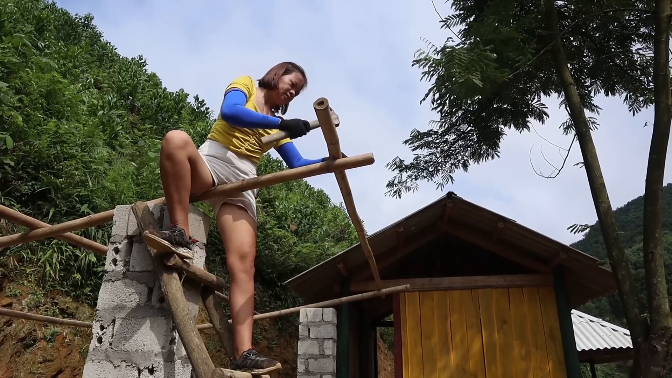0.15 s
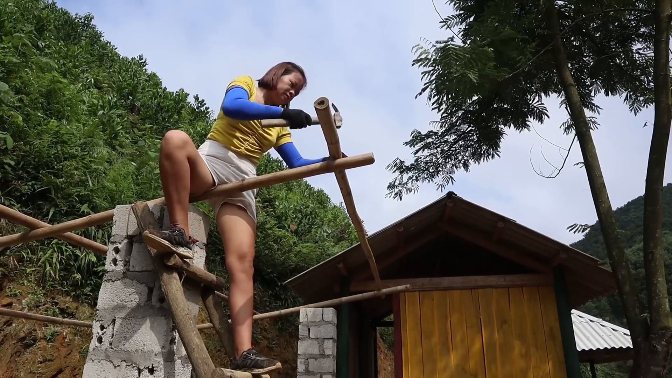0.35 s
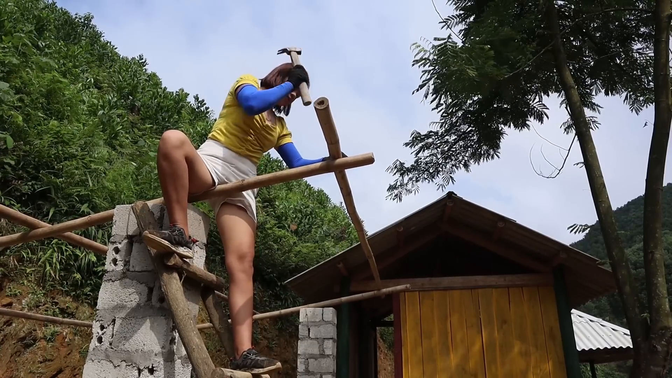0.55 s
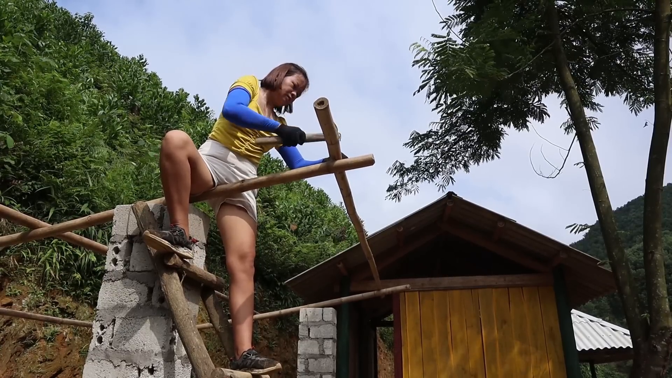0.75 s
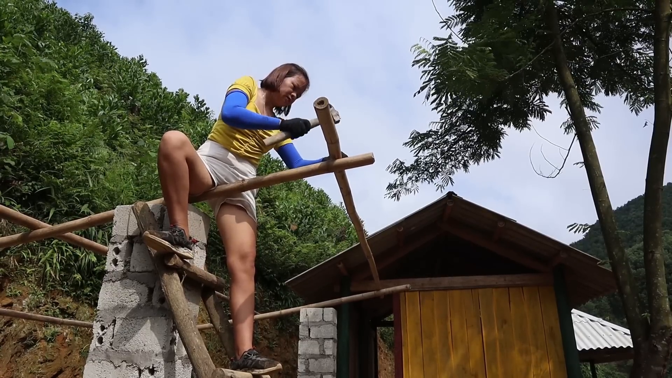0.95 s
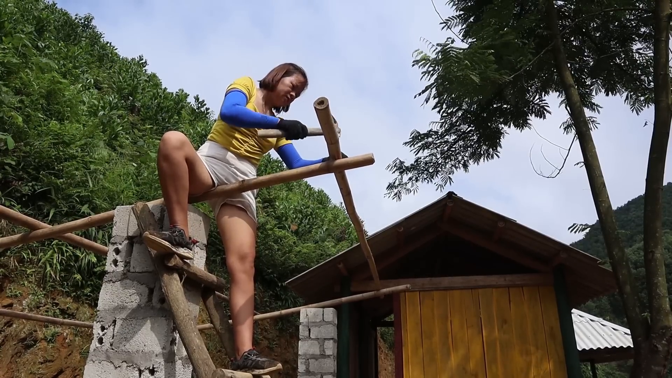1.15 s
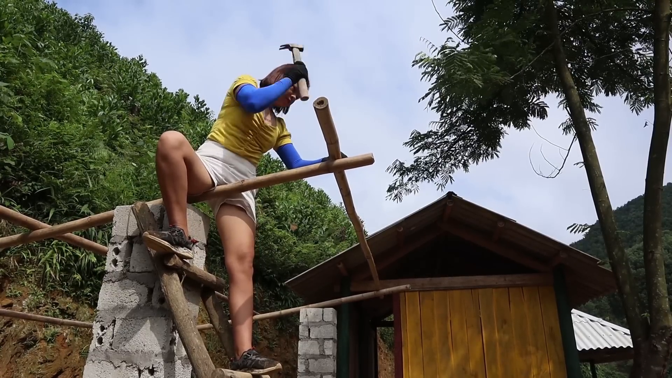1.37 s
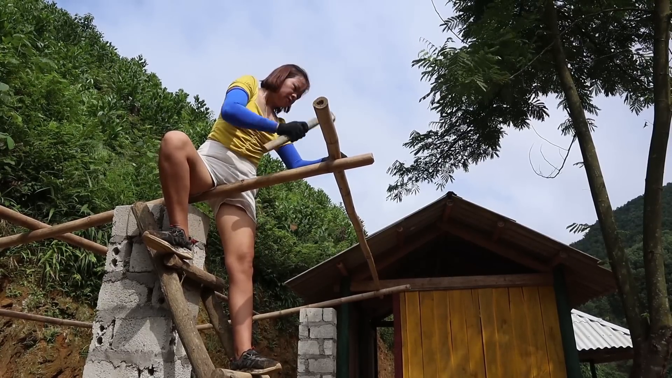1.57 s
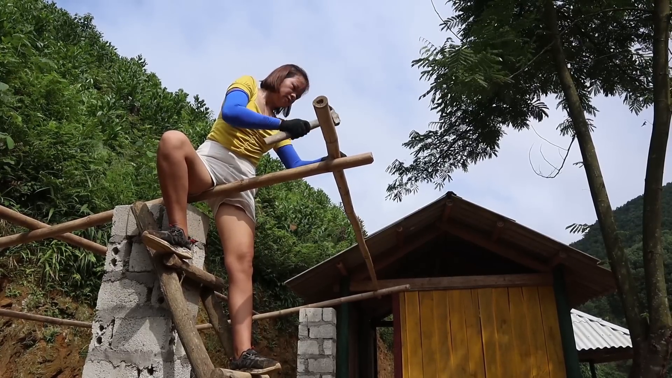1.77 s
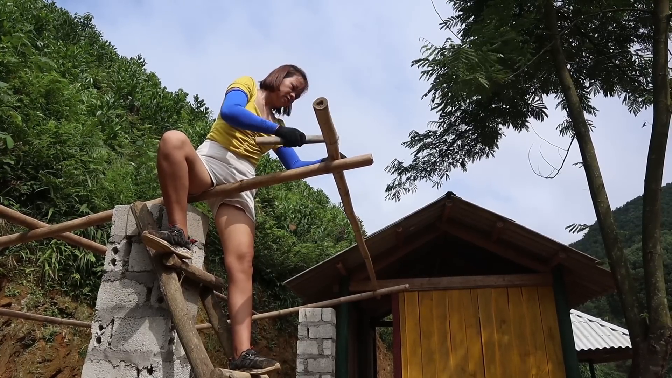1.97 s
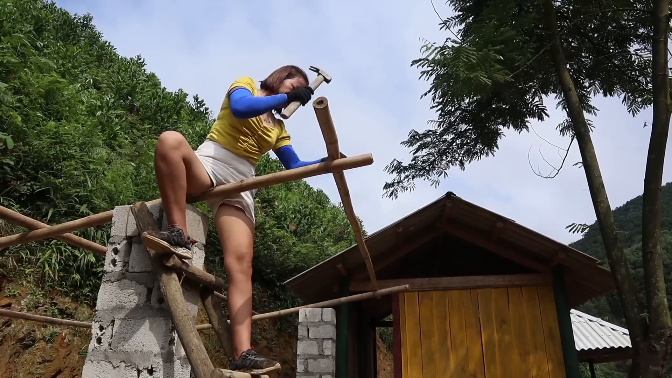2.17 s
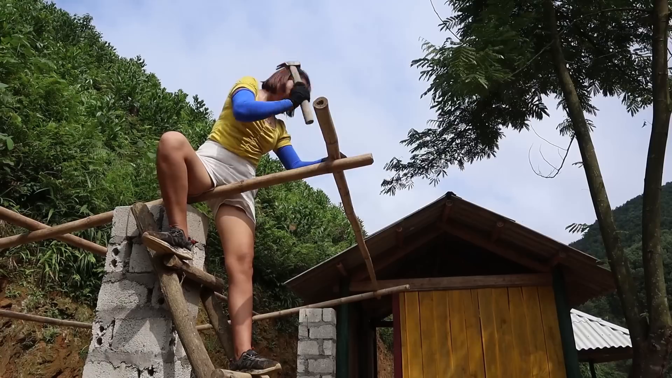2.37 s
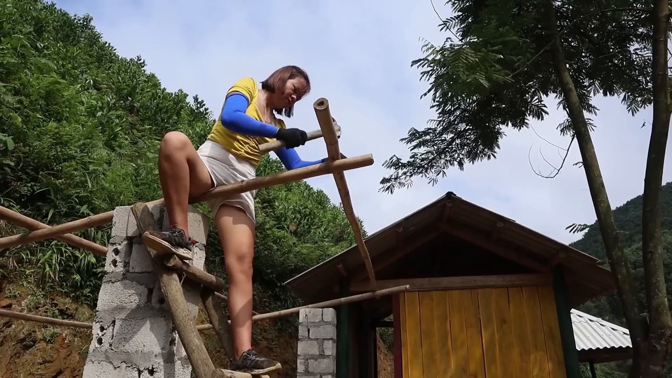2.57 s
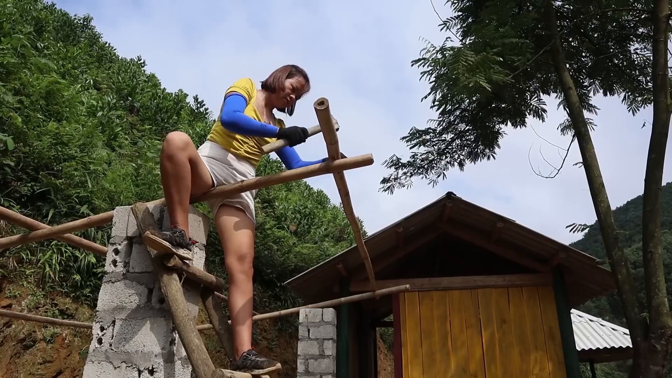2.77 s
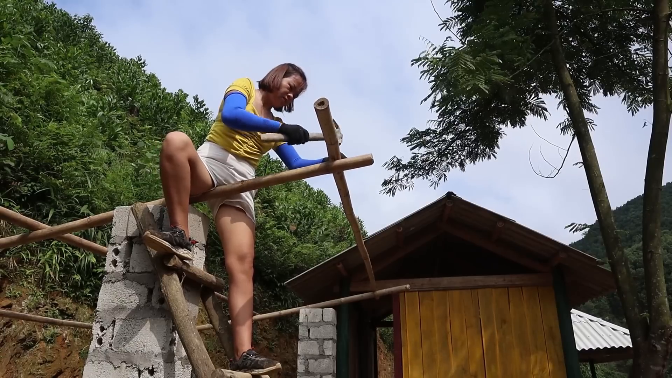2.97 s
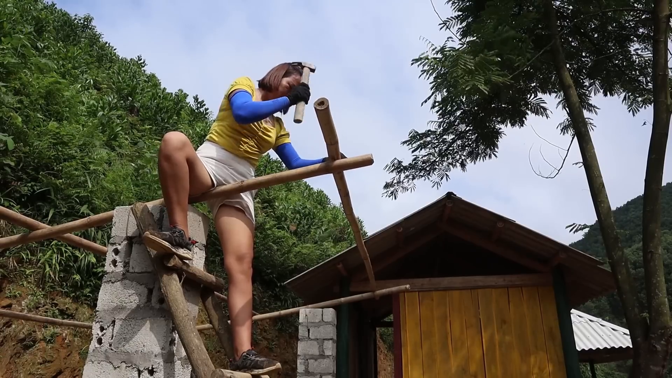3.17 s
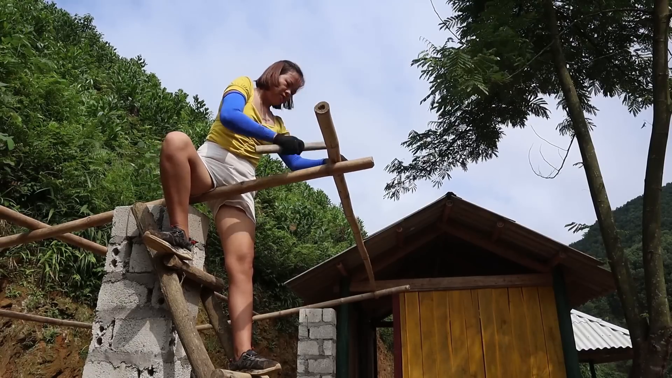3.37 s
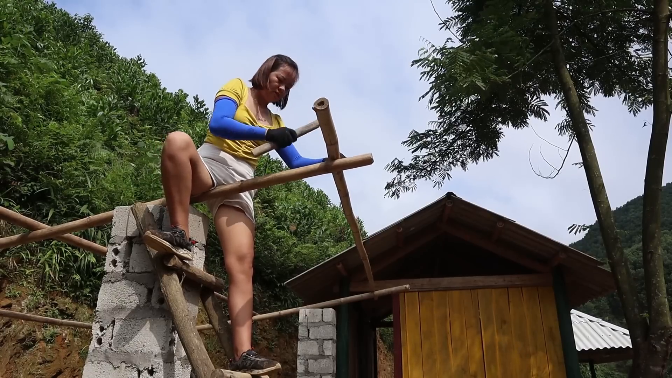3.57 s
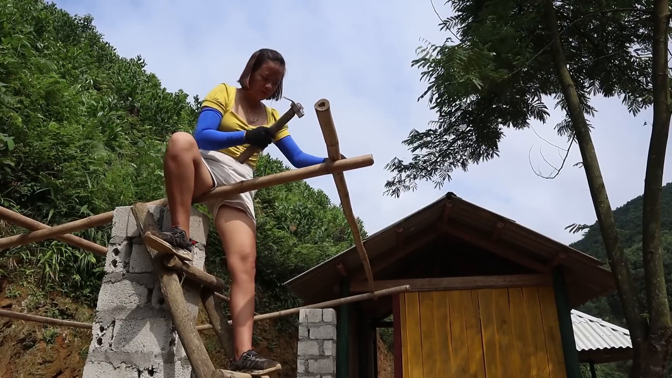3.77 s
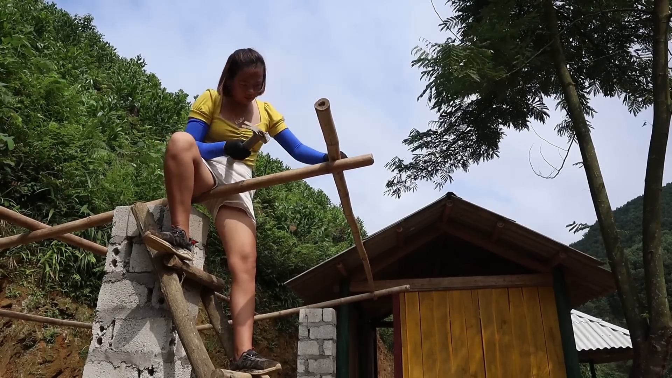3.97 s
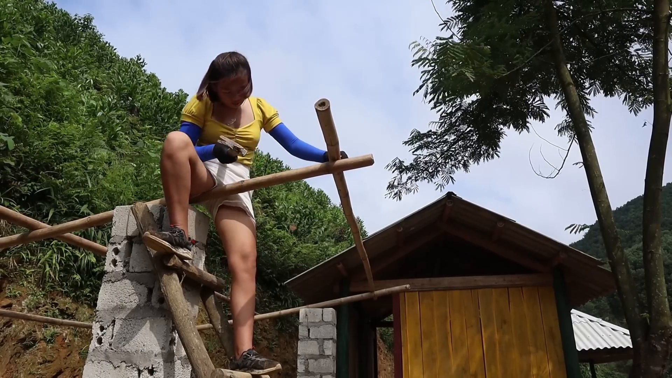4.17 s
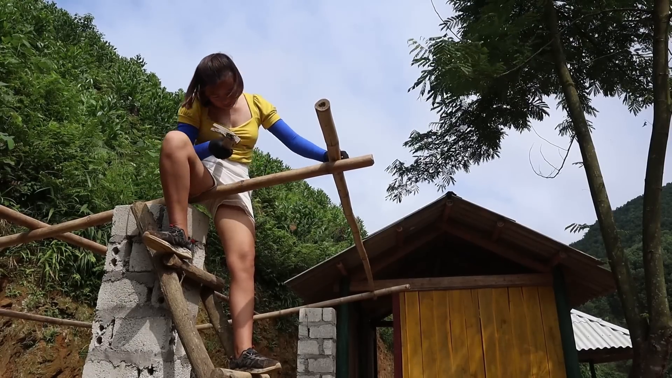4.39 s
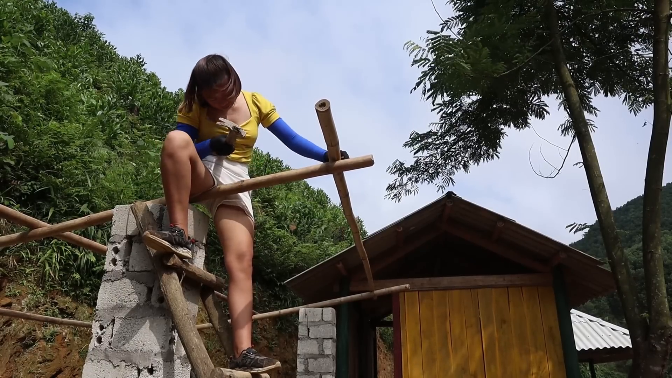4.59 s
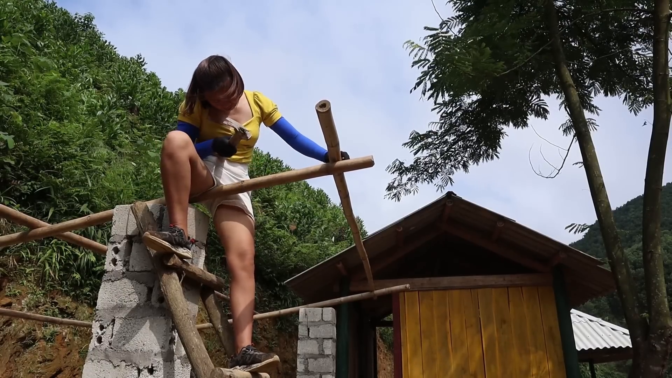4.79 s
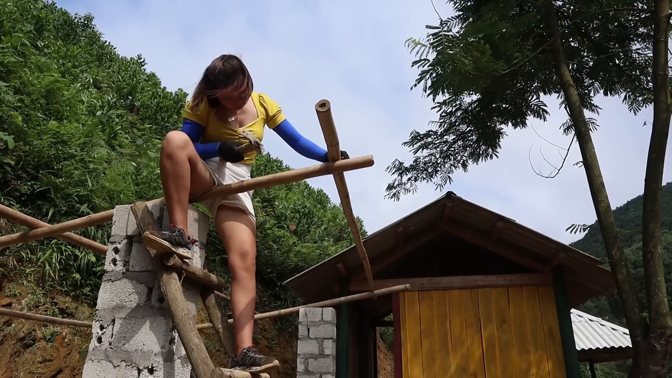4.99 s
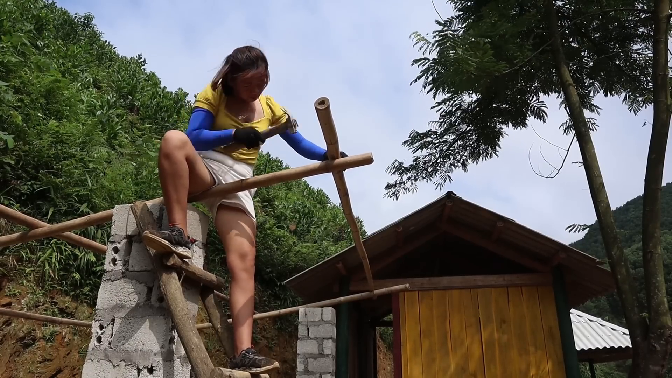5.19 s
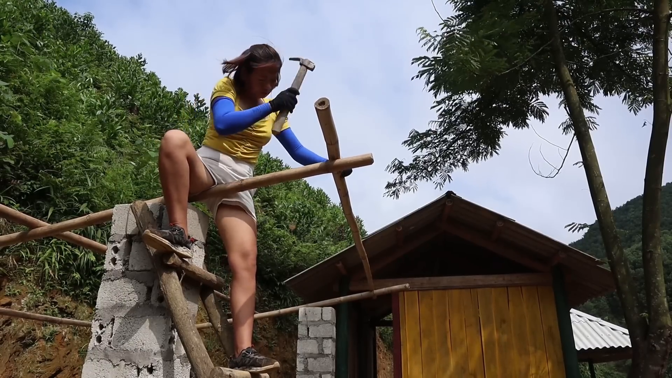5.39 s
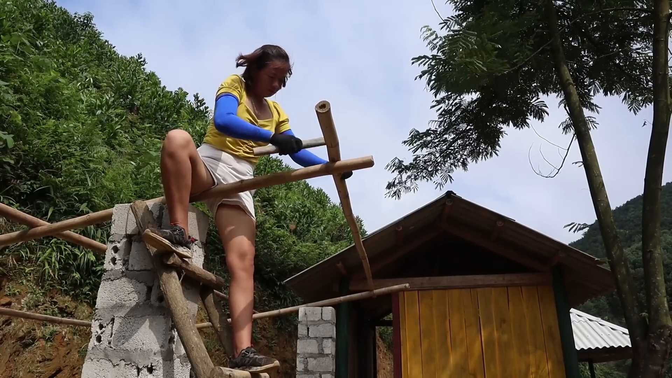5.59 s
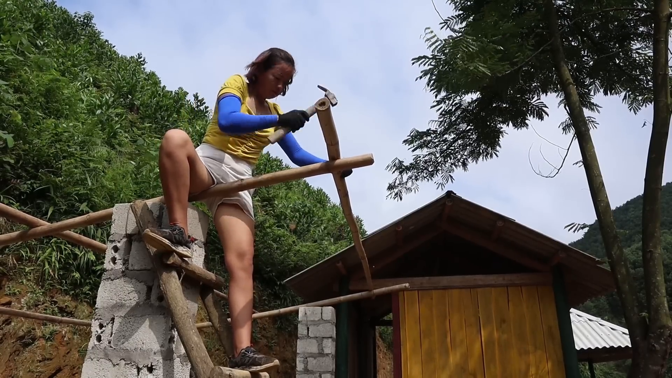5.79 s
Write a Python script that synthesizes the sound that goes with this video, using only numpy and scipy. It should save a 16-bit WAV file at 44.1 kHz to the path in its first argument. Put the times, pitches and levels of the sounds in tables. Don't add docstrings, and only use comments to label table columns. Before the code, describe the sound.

A close stereo outdoor scene of hammering on a round timber pole. The clip opens on the tail of a blow, with a loose wooden knock at 0.15 s. Blows land at about 0.34, 0.83, 1.18, 1.7, 2.07, 2.57, 3.0 and 3.47 s, alternating dull, hollow wood with brighter steel-on-nail cracks; the last of these is hardest, slightly clipped. Each rings briefly in pole and nail, slaps back from ground, block wall and hut, and leaves a faint wash from trees. Softer wood-on-wood rebounds fall between, near 1.0, 1.9 and 2.65 s. From 3.7 to 5.6 s hammering pauses: tiny claw and nail ticks, low wind puffs, strongest around 4.5 s with another near 5.15 s. Leaves hiss very faintly throughout; a low far bird note at 2.35 s and high falling calls at 4.2 and 4.55 s are barely audible. A final solid blow comes at 5.7 s, with a weak rebound.

```python
import sys
import numpy as np
from scipy import signal
from scipy.fft import rfft, irfft, next_fast_len
from scipy.io import wavfile
from scipy.ndimage import uniform_filter1d, map_coordinates

SR = 44100
rng = np.random.default_rng(int(sys.argv[2]) if len(sys.argv) > 2 else 0)


def master(y):
    cut = np.clip(np.atleast_2d(y).T, -1, 1)
    pcm = np.round(cut * 32767)
    wavfile.write(sys.argv[1], SR, pcm.astype(np.int16))


def magnitude_from_level(level_db):
    exponent = np.asarray(level_db, float) / 20
    return 10 ** exponent


N = 257544
LEAD = SR // 10


def unit(x):
    return x / np.sqrt(np.mean(x ** 2) + 1e-20)


def along(points, hz):
    point_hz, value = np.transpose(points)
    return np.interp(np.log(hz + 1), np.log(point_hz + 1), value)


def wobble(rate, size=N):
    knots = rng.standard_normal(int(size * rate / SR) + 4)
    return map_coordinates(knots, [np.arange(size) * rate / SR])


def filtered(x, response):
    size = next_fast_len(x.shape[-1] + 4096)
    spectrum = rfft(x, size) * response(np.fft.rfftfreq(size, 1 / SR))
    return irfft(spectrum, size)[..., :x.shape[-1]]


def body(x, modes):
    def resonances(f):
        total = 0
        for k, (hz, width, db) in enumerate(modes):
            total = total + (-1) ** k * magnitude_from_level(db) * 1j * f * width / (hz * hz - f * f + 1j * f * width)
        return total
    y = filtered(x, resonances)
    return y / np.abs(y).max()


def ringing(modes):
    t = np.arange(SR // 2) / SR
    chance_db = rng.normal(0, 2.5, len(modes))
    lines = 0
    for (hz, db, t60), chance in zip(modes, chance_db):
        rattle = 0.8 * min(1, hz / 700) * wobble(60, len(t))
        lines = lines + magnitude_from_level(db + chance - 60 * t / t60) * np.sin(2 * np.pi * hz * t + rattle)
    return lines[None] * (1 - np.exp(-t / 0.0024))


def push(t, contact):
    return t / contact * np.exp(-t / contact)


def add(track, s, sound):
    part = track[:, LEAD + round(s * SR):][:, :sound.shape[1]]
    part += sound[:, :part.shape[1]]


def pair(noise, alike):
    def mid_side(hz):
        turn = np.arccos(np.clip(along(alike, hz), -1, 1)) / 2
        return np.array([np.cos(turn), np.sin(turn)])
    mid, side = filtered(noise, mid_side)
    return np.array([mid + side, mid - side])


# start_s, strength_db, steel_crack_db, pole_bending_db
HAMMER_BLOWS = [(-0.028, 0, -13, -17.5),
                (0.3424, -2, -21.5, -19),
    (0.8273, 0.5, -12.5, -15),
    (1.181, -2, -22, -17.5),
    (1.7047, 1, -11, -19),
    (2.0672, -0.5, -19, -17),
    (2.571, -0.5, -11.5, -14.5),
    (2.9904, -1, -20.5, -18.5),
    (3.4747, 2.5, -12.5, -11.5),
    (5.6944, 0.5, -16.5, -11.5),
]
# pitch_hz, width_hz, level_db
FACE = [(985, 270, -10), (1490, 453, 6), (1920, 544, 4), (2807, 590, -3.5), (4050, 300, -18)]
# pitch_hz, width_hz, level_db
BOOM = [(94.93, 21, -17.5), (156, 45, -7.5), (332, 140, 0), (505, 200, 4.5), (693, 290, 5.5),
        (1060, 360, -2)]
# pitch_hz, width_hz, level_db
STEEL = [(2847, 300, 5.5), (4320, 610, -1.5), (6800, 1300, -1), (9350, 15000, -11), (13426, 7600, -15)]
# pitch_hz, level_db, t60_s
FINE_TONES = [(1210, -28, .13), (1312, -27, .14), (1415, -23, .2), (1536, -24, .14), (1660, -22, .16),
              (1800, -27, .14), (1965, -30, .1)]
# pitch_hz, level_db, t60_s
RING = [(618.6, -32, 0.33), (688, -19, 0.22), (773, -25.5, 0.29)]
# pitch_hz, level_db, t60_s
HEAD = [(4400, -27, .16), (4500, -25, .25)]
# pitch_hz, level_db, t60_s
SWAY = [(102, -15, 0.078), (148, -7.5, 0.53)]
# pitch_hz, level_db, t60_s
SHANK = [(2848, -14.5, 0.082)]


def hammer():
    track, t = np.zeros((2, N + LEAD)), np.arange(LEAD) / SR
    force = -push(t, .00008) ** 2
    face, boom = body(force, FACE), body(force, BOOM)
    steel = body(t == 0, STEEL)
    for s, face_db, steel_db, boom_db in HAMMER_BLOWS:
        square_db = steel_db + 25.5
        answer_db = -2 + 0.42 * square_db
        wood = magnitude_from_level(face_db + 2.5 - 0.62 * square_db) * face + magnitude_from_level(boom_db + 2.5) * boom
        chatter = rng.standard_normal((3, LEAD)) * (1 - np.exp(-t / 0.00026)) * np.exp(-t / 0.0021)
        crack = magnitude_from_level(steel_db + 12.5) * body(chatter[0] + 0.18 * chatter[1:], STEEL)
        even = magnitude_from_level(steel_db + 7.5) * steel
        near_wood = site(wood, wood, answer_db, walls_db=0, stretch=1)
        near_steel = site(crack, even, answer_db - 0.5, walls_db=-3.0, stretch=0.76)
        add(track, s - 0.0001, near_wood + near_steel)
        add(track, s, far_trees(wood + even))
        add(track, s, magnitude_from_level(face_db + 3.5 - 0.52 * square_db) * ringing(FINE_TONES))
        add(track, s, magnitude_from_level(boom_db + 23.5 - 0.3 * square_db) * ringing(RING))
        add(track, s, magnitude_from_level(2.2 * square_db - 36.5) * ringing(HEAD))
        add(track, s, magnitude_from_level(0.65 * square_db - 33.5) * ringing(SWAY))
        add(track, s, ringing(SHANK))
    return track[:, LEAD:]


# start_s, peak_db, grit_db
KNOCKS = [(0.149, -11.5, 2.5), (0.211, -24, -9), (1.006, -11, 0.5), (1.081, -24.5, -18.5),
          (1.893, -10, 1.5), (1.946, -19, -11), (1.974, -24.5, 2.5), (2.64, -11, -18.5), (2.72, -20, 1),
          (2.821, -18, -3), (2.889, -32.5, -12.5), (3.709, -25.5, -0.5), (5.834, -21, 1)]
# pitch_hz, width_hz, level_db
SEAT = [(306.8, 540, -1.5), (1000, 330, 3.5), (1720, 130, -1)]
# pitch_hz, width_hz, level_db
GRIT = [(1800, 870, 2.5), (4370, 3500, -8)]


def rebound():
    track, t = np.zeros((2, N + LEAD)), np.arange(LEAD) / SR
    later = np.maximum(t - .0065, 0)
    touch, seat = push(t, .0004) ** 2, -push(later, .0003) ** 2
    wood = 0.36 * body(touch, BOOM) + 0.15 * body(seat, BOOM) + 0.71 * body(np.gradient(seat), SEAT)
    soft_bark = lambda hz: 1 / (1 + 1j * hz / 4110) ** 2
    for s, peak_db, grit_db in KNOCKS:
        crush = filtered(rng.standard_normal(LEAD) * push(later, 0.0039), soft_bark)
        knock = wood + magnitude_from_level(grit_db - 20.0) * body(crush, GRIT)
        near = site(knock, knock, answer_db=-0.5, walls_db=-10.5, stretch=0.94)
        add(track, s - .0058, magnitude_from_level(peak_db + 2) * near)
    return track[:, LEAD:]


# start_s, peak_db, pitch_hz
TICKS = [(0.683, -46, 568), (1.392, -69, 1600), (1.445, -57, 7500), (1.561, -59, 6640), (2.48, -55, 3300),
         (3.873, -51, 3070), (3.9408, -46.5, 4000), (4.24, -55.5, 4050), (4.563, -54, 2770),
         (4.949, -55, 4300), (5.116, -49, 3570), (5.185, -57, 3500), (5.304, -55.5, 5800), (5.5, -54, 4150)]


def ticks():
    track, t = np.zeros((2, N + LEAD)), np.arange(LEAD) / SR
    for s, db, hz in TICKS:
        width = 0.22 * hz
        touch = rng.standard_normal(LEAD) * magnitude_from_level(-60 * t / 0.023)
        narrow = body(touch, [(hz, width, 0)])
        add(track, s, magnitude_from_level(db) * body(narrow, [(hz, 2 * width, 0)])[None])
    return track[:, LEAD:]


# pitch_hz, likeness
SPREAD = [(100, 1), (700, .99), (1500, 0.9), (3000, 0.55), (6000, 0.17), (12000, 0.13)]


def tail(decay, share, stretch, lumpy_db):
    size = SR // 2
    noise = rng.standard_normal((2, size)) * magnitude_from_level(lumpy_db * rng.standard_normal(size))
    hz, t, z = signal.stft(pair(unit(noise), SPREAD), SR, nperseg=256)
    t60 = stretch * along(decay, hz)[:, None]
    fade = magnitude_from_level(along(share, hz)[:, None] - 60 * t / t60)
    y = signal.istft(z * fade, SR, nperseg=256)[1][:, :size]
    build_up = 1 - np.exp(-np.arange(size) / SR / .0025)
    return magnitude_from_level(-25.5) * y * build_up


# delay_s, level_db, sign
WALLS = [(.0065, -1, 1), (.0091, -10, 1), (.0153, -1, -1), (.0225, -9, 1), (.0250, -8, -1), (.0325, -10, 1)]
# pitch_hz, t60_s
SITE = [(100, 0.88), (260, 0.35), (700, 0.26), (1800, 0.23), (4800, 0.37), (12000, 0.27)]
# pitch_hz, level_db
RETURN = [(150, -1), (700, 1), (1600, -1.5), (2900, -2.5), (4500, -0.5), (7000, -5), (10000, -5),
          (13000, -13)]


def site(direct, blended, answer_db, walls_db, stretch):
    def walls(f):
        echoes = sum(sign * magnitude_from_level(db + walls_db) * np.exp(-2j * np.pi * f * s) for s, db, sign in WALLS)
        return echoes / (1 + 1j * f / 4450) ** 2
    scatter = magnitude_from_level(answer_db) * tail(SITE, RETURN, stretch, lumpy_db=4.5)
    y = signal.fftconvolve(blended[None], scatter, axes=1)
    y[:, :LEAD] += direct + filtered(blended, walls)
    return y


# pitch_hz, t60_s
VALLEY = [(150, .9), (700, 0.86), (1500, 0.8), (4000, 0.44), (12000, 0.51)]
# pitch_hz, level_db
FAR = [(150, -27), (600, -24.5), (1500, -26.5), (2600, -21), (4500, -17.5), (8000, -15.5), (12000, -23.5)]


def far_trees(blow):
    return signal.fftconvolve(blow[None], tail(VALLEY, FAR, 1.0, lumpy_db=2), axes=1)


# time_s, level_db
WIND = [(0, -44), (.3, -54), (.6, -50), (1.199, -54.5), (1.7, -50), (2.499, -59), (2.9, -45), (3.15, -62),
        (3.4, -45), (3.9, -45.5), (4.3, -52.5), (4.5, -27.5), (4.7, -50.5), (4.8, -49.5), (5.1, -44),
        (5.32, -55.5), (5.45, -49), (5.84, -58.5)]
# pitch_hz, level_db_per_hz
BUFFET = [(12, -41.5), (20, -4), (54, 5), (151, -12.5), (300, -21.5), (425, -39.5), (650, -68),
          (1100, -120)]
# start_s, peak_db, pitch_hz
PUFFS = [(2.915, -33, 70.6), (3.311, -37, 70.6), (3.864, -31, 86.1), (4.127, -41.5, 67), (4.289, -39, 63.4),
         (4.401, -40, 67.3), (4.434, -35, 147), (4.472, -24.5, 152.5), (4.474, -30, 84.5),
         (4.473, -35, 272), (4.524, -25.5, 99), (4.554, -30, 171), (4.603, -30.5, 163),
         (4.617, -33.5, 64.4), (4.698, -37, 61.6), (4.858, -38, 99), (4.911, -39.5, 97), (4.958, -37.5, 95),
         (5.084, -39, 99.6), (5.136, -28.5, 143), (5.17, -36, 143), (5.429, -37.5, 81), (5.489, -42, 190),
         (5.585, -40, 132.5), (5.603, -40, 109)]


def wind():
    gust_s, gust_db = np.transpose(WIND)
    noise = pair(rng.standard_normal((2, N)), [(30, 1.0), (100, 1.0), (300, 0.32)])
    noise = filtered(noise, lambda hz: magnitude_from_level(along(BUFFET, hz)) * (hz < 600))
    lumpy = unit(noise * magnitude_from_level(2.8 * wobble(32)))
    swell_db = 1.5 * wobble(11)
    tilt_db = [[1.1], [-1.1]]
    buffet = magnitude_from_level(np.interp(np.arange(N) / SR, gust_s, gust_db) + swell_db + tilt_db) * lumpy
    track, t = np.zeros((2, N + LEAD)), np.arange(-SR // 40, SR // 40) / SR
    for s, db, hz in PUFFS:
        cycle = np.cos(2 * np.pi * 1.1 * hz * t + rng.uniform(2.3, 2.4))
        eddy = np.exp(-(2.2 * hz * t) ** 2) * cycle
        add(track, s + t[0] + 0.00358, magnitude_from_level(db + 4 + 0.25 * np.array([[1], [-1]])) * eddy)
    flow = buffet + track[:, LEAD:]
    suction = flow - 6 * flow ** 2
    lag_s = np.array([[.001], [0]])
    return filtered(suction, lambda hz: np.exp(-2j * np.pi * hz * lag_s) * (hz / (hz + 25)) ** 2)


# start_s, length_s, from_hz, to_hz, level_db
BIRD = [
    (2.342, 0.15, 462, 464, -63.5),
    (4.206, 0.11, 4980, 3790, -74),
    (4.564, 0.13, 4970, 3870, -71),
]


def birds():
    track = np.zeros((2, N + LEAD))
    for s, length, from_hz, to_hz, db in BIRD:
        size = round(length * SR)
        u = np.arange(size) / size
        cycles = length * (from_hz * u + (to_hz - from_hz) * u * u / 2)
        add(track, s, magnitude_from_level(db) * np.sin(np.pi * u) ** .5 * np.sin(2 * np.pi * cycles)[None])
    return track[:, LEAD:]


# pitch_hz, level_db_per_hz
LEAVES = [(120, -40), (200, -10), (390, -8.5), (636, -9), (1350, -11.5), (4090, -16.5), (11200, -33.5),
          (13000, -53.5)]
# pitch_hz, likeness
ALIKE = [(100, .9), (300, .7), (700, .1), (1500, -.2), (7000, -.25), (15000, -.5)]


def leaves():
    z = signal.stft(rng.standard_normal((2, N)), nperseg=512)[2]
    field = uniform_filter1d(rng.standard_normal(z.shape[1:]), 6, 0)
    flutter = unit(uniform_filter1d(field, 12, 1))
    noise = signal.istft(z * magnitude_from_level(1.5 * flutter), nperseg=512)[1][:, :N]
    rustle = filtered(pair(noise, ALIKE), lambda hz: magnitude_from_level(along(LEAVES, hz)))
    return magnitude_from_level(-58.5 + 0.8 * wobble(1.1)) * unit(rustle)


# pitch_hz, difference_db
PORTS = [(300, -0.5), (2000, -.5), (4400, -1), (8000, -3.5), (15000, -4.5)]


def scene():
    def ports(hz):
        delay_s = np.array([[.00002], [0]])
        return magnitude_from_level(along(PORTS, hz) * [[.5], [-.5]]) * np.exp(-2j * np.pi * hz * delay_s)
    return filtered(hammer() + rebound(), ports) + ticks() + wind() + birds() + leaves()


def top_cut(x):
    return signal.sosfilt(signal.butter(12, 16370, fs=SR, output="sos"), x)


def record(dry):
    flat = np.clip(dry, -1.05, 1.05)
    mix = filtered(flat, lambda hz: 1 / (1 + (hz / 16100) ** 16))
    return top_cut(mix)


dry = scene()
out = record(dry)
master(out)
```